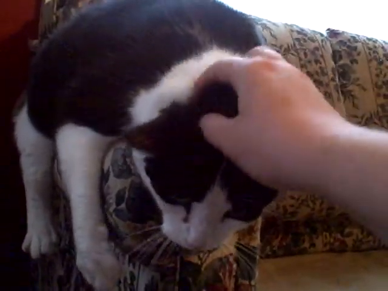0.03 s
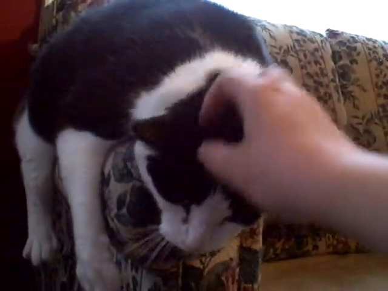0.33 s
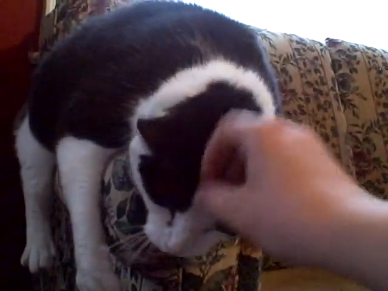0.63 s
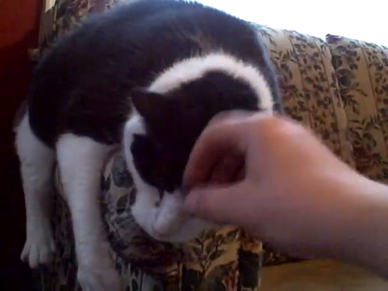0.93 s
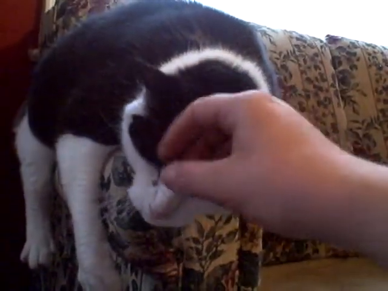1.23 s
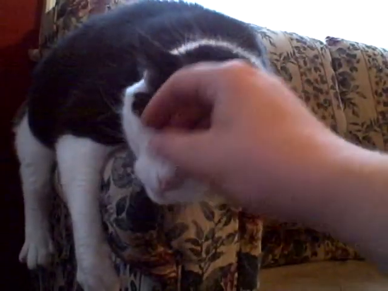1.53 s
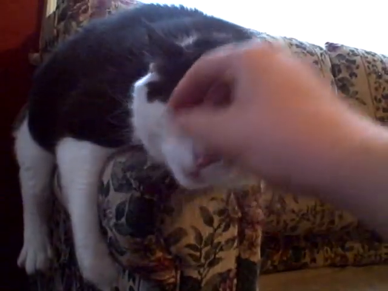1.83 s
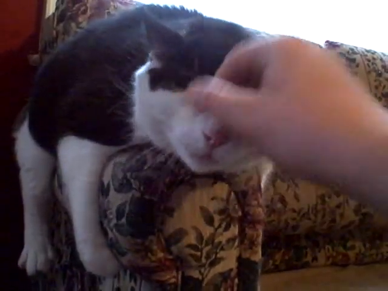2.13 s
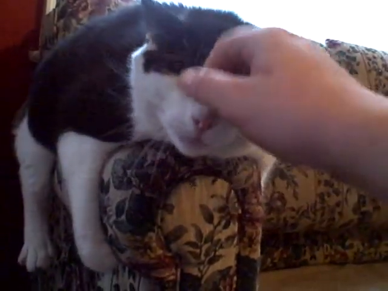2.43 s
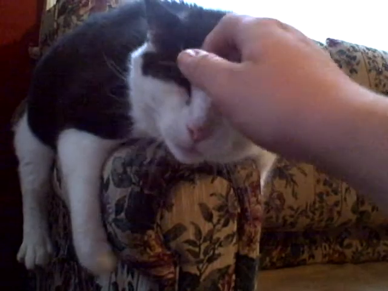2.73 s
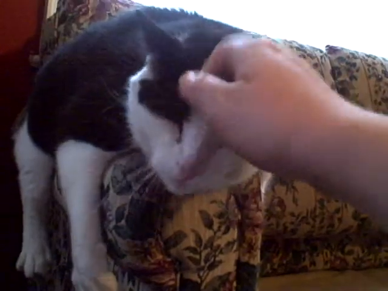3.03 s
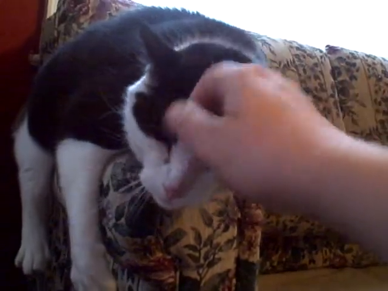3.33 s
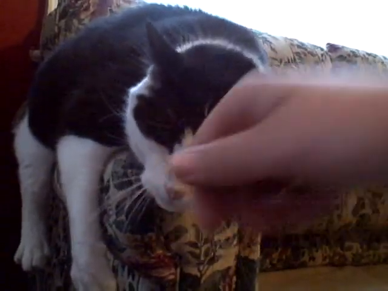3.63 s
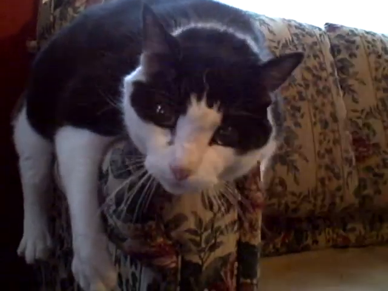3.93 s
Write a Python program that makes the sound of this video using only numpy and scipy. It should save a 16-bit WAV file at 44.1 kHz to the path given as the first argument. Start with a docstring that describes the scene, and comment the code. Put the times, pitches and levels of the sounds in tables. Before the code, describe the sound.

Fur rustling and crackling under a stroking hand, with faint cat purring and steady hiss.

```python
"""Stroking a purring cat.

A hand strokes a cat on a sofa in a small room, close to a small camera. The fur rustles; tufts and
hairs spring free in crackles and sharp ticks. The cat purrs in soft, low puffs from its throat.
Hand and cat shift with dull bumps, and faint short tones whistle. Mains hum and hiss lie under it all.
The microphone rings between 6 and 7 kHz: a peak in the fur and snap spectra."""
import sys
import numpy as np
from scipy import signal
from scipy.fft import rfft, irfft
from scipy.io import wavfile
from scipy.ndimage import uniform_filter1d

SR = 44100
rng = np.random.default_rng(int(sys.argv[2]) if len(sys.argv) > 2 else 0)


def master_out(mix):
    """Clip the mix to full scale and print it as 16-bit PCM to the path in sys.argv[1]."""
    frames = np.transpose(np.atleast_2d(mix))
    ceiling = np.clip(frames, -1, 1)
    pcm = np.round(ceiling * 32767).astype(np.int16)
    wavfile.write(sys.argv[1], SR, pcm)


N = 4 * SR

# Mains hum. Each row: harmonic number, level in dB.
HUM_HARMONICS = [(1, -48.5), (2, -62), (3, -69), (7, -73), (10, -73.5)]
# Spectra of hiss with low rumble, purr pulse, fur rub, crackle snaps and a tick's dry crack.
# Each row: frequency in Hz, relative density in dB.
HISS_SPECTRUM = [(15, 0.5), (27, 10.5), (42, 5), (75, 1.5), (105, -2), (160, -8), (235, -2), (330, -6),
                 (450, -13), (1000, -17.5), (1600, -20), (2900, -17.5), (4200, -17), (5200, -13),
                 (6100, -13.5), (7200, -8), (8000, -20.5), (8600, -27), (9200, -41.5)]
PURR_SPECTRUM = [(50, -9.5), (130, -5), (220, -3.5), (300, 8), (400, -12), (550, -19), (1000, -10.5),
                 (1500, -25), (3000, -38.5), (8000, -54)]
FUR_SPECTRUM = [(150, -25.5), (400, -11), (1000, -11.5), (1500, -14.5), (2900, -10), (4200, -11),
                (5200, -4.5), (6100, 2), (7200, -3), (8000, -13.5), (9000, -29.5)]
SNAP_SPECTRUM = [(150, -26), (500, -15.5), (1500, -22.5), (3200, -14), (4400, -16), (5300, -6.5),
                 (6200, 1.5), (7300, 1), (8100, -15), (9000, -29)]
CRACK_SPECTRUM = [(200, -3), (700, 1), (1600, 8), (3400, 3), (5000, -2.5), (7500, -0.5), (9000, -8)]
# Faint tones. Each row: centre in seconds, length in seconds, pitch in Hz, glide in octaves, level in dB.
WHISTLE_TONES = [(0.874, 0.04, 769, 0.21, -47.5), (0.889, 0.039, 999, 0.087, -53),
                 (0.994, 0.036, 1254, -0.26, -57.5), (1.084, .07, 882, -0.17, -56.5),
                 (1.295, 0.027, 1056, 0.093, -50), (1.418, 0.074, 982, 0.054, -53),
                 (1.527, 0.045, 1007, -0.15, -53), (1.913, .03, 1002, -0.021, -57.5),
                 (2.137, 0.041, 988, 0.0052, -52.5), (2.508, 0.022, 1426, -0.015, -54),
                 (2.822, 0.055, 965, -0.13, -51), (3.041, 0.079, 719, 0.067, -57)]
# Soft knocks. Each row: start in seconds, peak in dB.
BUMP_HITS = [(3.5831, -41), (3.5925, -27.5), (3.603, -37), (3.887, -34.5), (3.995, -33.5)]
# Resonances of a knock. Each row: frequency in Hz, relative level in dB, T60 in seconds.
THUD_MODES = [(235, -12.5, 0.027), (347, -6, 0.02), (610, -5.5, 0.0063), (880, -31, 0.017)]
# Purring. Each row: first pulse in seconds, length in seconds, pulses per second, initial level in dB.
PURR_RUNS = [(0.085, 0.22, 22, -46.5), (0.408, 0.14, 23.5, -50), (0.795, 0.12, 23.7, -50.5),
             (1.032, 0.12, 32, -54), (1.371, 0.12, 45, -49), (1.871, 0.16, 31, -46),
             (2.269, 0.22, 27.5, -47), (2.832, 0.25, 30.3, -45.5), (3.432, 0.22, 34, -47.5)]
# Fingers on the coat. Each row: centre in seconds, length in seconds, band centre in Hz, level in dB.
FINGER_BRUSHES = [(.258, .028, 4830, -47), (0.444, 0.035, 4300, -50), (0.816, 0.041, 2840, -50.5),
                  (0.906, 0.12, 2700, -56.5), (1.076, 0.034, 4700, -49), (1.228, 0.032, 4970, -46.5),
                  (2.836, 0.078, 2700, -54.5), (2.937, 0.055, 2150, -57), (2.964, .07, 3540, -54.5),
                  (3.14, .05, 2180, -53.5), (3.287, 0.049, 2940, -53.5), (3.889, 0.053, 970, -54),
                  (3.932, 0.16, 2850, -58)]
# Stroke envelope. Each row: time in seconds, level of the rub in dB.
STROKE_LEVELS = [(0, -52.5), (.14, -52), (.2, -50), (.38, -48), (0.591, -52), (.7, -49.5), (.76, -50.5),
                 (.95, -50.5), (1.06, -50.5), (1.14, -50.5), (1.53, -48.5), (1.63, -53), (2.02, -49.5),
                 (2.13, -52.5), (2.2, -43.5), (2.37, -51), (2.7, -48.5), (2.77, -52.5), (2.87, -51),
                 (3.1, -48.5), (3.18, -47), (3.39, -52), (3.52, -48), (3.68, -47), (3.77, -51), (4, -47.5)]
# Tufts springing free. Each row: start in seconds, length in seconds, level in dB.
CRACKLE_BURSTS = [(0.156, 0.015, -34), (0.358, 0.008, -39.5), (0.479, 0.025, -46), (0.544, 0.0066, -38.5),
                  (0.629, .012, -42), (0.657, 0.015, -41), (0.682, 0.015, -39.5), (0.89, 0.0078, -40),
                  (1.017, 0.014, -37), (1.04, 0.012, -41), (1.072, 0.009, -44.5), (1.489, 0.005, -48),
                  (1.556, 0.012, -43), (1.868, 0.013, -44.5), (2.859, 0.011, -43.5), (3.502, 0.0068, -40),
                  (3.621, 0.021, -45.5)]
# Single snaps. Each row: start in seconds, ring pitch in Hz, ring peak in dB, crack peak in dB.
HAIR_TICKS = [(0.072, 6050, -33, -48), (.1555, 6700, -29, -51), (.1895, 6100, -32, -53),
              (0.361, 6440, -39, -55), (0.4923, 6760, -29, -55), (.542, 6400, -27, -43),
              (0.553, 5460, -28.5, -38), (0.6515, 6260, -27, -37), (0.6863, 6050, -32, -51),
              (0.6984, 6800, -26.5, -47), (0.964, 6200, -31, -53), (1.023, 6600, -24, -25.5),
              (1.0413, 6200, -30, -54), (1.065, 6080, -31, -59), (1.2187, 5400, -32.5, -45),
              (1.366, 6200, -34, -50), (1.4865, 6000, -27, -41), (1.508, 5960, -29.5, -46),
              (1.743, 5840, -33, -52), (2.0645, 6760, -32.5, -51), (2.2401, 6200, -30, -45),
              (2.3293, 6120, -34.5, -48), (2.4225, 6200, -44, -45), (2.469, 6080, -31.5, -50),
              (2.5381, 7000, -33, -40.5), (2.6972, 5800, -35, -43), (2.8605, 6150, -33, -51),
              (2.941, 6040, -31, -45), (3.3221, 6080, -31.5, -44), (3.4358, 6000, -33, -56),
              (3.502, 6100, -30, -40), (3.6156, 6140, -25.5, -32), (3.7098, 5970, -31.5, -44),
              (3.7743, 6000, -33, -49), (3.8273, 6240, -33, -37)]

RING_RISE_S = 0.0009


def amp(db):
    """Decibels to gain."""
    return 10 ** (np.asarray(db) / 20)


def unit(x):
    """Scales to rms 1."""
    return x / np.sqrt(np.mean(abs(x) ** 2) + 1e-20)


def add(mix, start_s, sound):
    """Mixes a sound in at start_s."""
    part = mix[max(round(start_s * SR), 0):][:len(sound)]
    part += sound[:len(part)]


def response(spectrum, size=8192):
    """Minimum-phase impulse response of energy 1 with the given spectrum."""
    hz, db = np.transpose(spectrum)
    bins_hz = np.fft.rfftfreq(size, 1 / SR) + 1
    gain = amp(np.interp(np.log(bins_hz), np.log(hz), db))
    cepstrum = irfft(np.log(gain))
    cepstrum[1:size // 2] *= 2
    cepstrum[size // 2 + 1:] = 0
    impulse = irfft(np.exp(rfft(cepstrum)))[:size // 2]
    return impulse / np.linalg.norm(impulse)


def colour(x, spectrum):
    """Filters x by a spectrum."""
    return signal.fftconvolve(x, response(spectrum))[:N]


def grains(per_s, spread_db):
    """Random clicks of uneven size."""
    sizes = amp(spread_db * np.minimum(rng.exponential(1, N), 4))
    return unit(sizes * rng.choice([-1, 1], N) * (rng.random(N) < per_s / SR))


def patchy(x, depth_db, size=512):
    """Lets narrow patches of the spectrum swell and fade."""
    frames = signal.stft(x, nperseg=size)[2]
    field = uniform_filter1d(rng.standard_normal(frames.shape), size=5, axis=0)
    field = uniform_filter1d(field, size=6, axis=1)
    return unit(signal.istft(frames * amp(depth_db * unit(field)), nperseg=size)[1][:N])


def swish(noise, length_s, hz, width_oct):
    """A band of noise that swells and fades."""
    bins_hz = np.fft.rfftfreq(len(noise), 1 / SR) + 1
    bell = np.exp(-.5 * (np.log2(bins_hz / hz) / width_oct) ** 2)
    band = unit(irfft(rfft(noise) * bell)[:round(length_s * SR)])
    return band * np.sin(np.linspace(0, np.pi, len(band)))


def hum_and_hiss(mains_hz=60.02, hiss_db=-51):
    """Mains harmonics over steady hiss with a low rumble at the purr's fundamental."""
    t = np.arange(N) / SR
    hum = sum(amp(db) * np.sqrt(2) * np.sin(2 * np.pi * (harmonic * mains_hz * t + rng.random()))
              for harmonic, db in HUM_HARMONICS)
    return hum + amp(hiss_db) * unit(colour(rng.standard_normal(N), HISS_SPECTRUM))


def room(x, t60_s=0.23, gap_s=0.002, gain_db=-12):
    """Short reverberant tail of a furnished room."""
    t = np.arange(SR // 3) / SR
    tail = rng.standard_normal(len(t)) * amp(-60 * t / t60_s) * (t > gap_s)
    return amp(gain_db) * signal.fftconvolve(x, tail / np.linalg.norm(tail))[:N]


def whistles(width_hz=200, pure_share=0.58, air_db=-12):
    """Faint, fuzzy tones that glide a little, each inside a longer, broader puff of noise."""
    out = np.zeros(N)
    lowpass = signal.butter(2, width_hz / 2, fs=SR)
    fuzz = signal.lfilter(*lowpass, rng.standard_normal(N) + 1j * rng.standard_normal(N))
    for centre_s, length_s, hz, glide_oct, db in WHISTLE_TONES:
        position = np.linspace(-.5, .5, round(length_s * SR))
        flutter = unit(np.roll(fuzz, -round(centre_s * SR))[:len(position)])
        body = unit(pure_share + (1 - pure_share) * flutter)
        phase = 2 * np.pi * np.cumsum(hz * 2 ** (glide_oct * position)) / SR
        tone = np.sqrt(2) * (body * np.exp(1j * phase)).real
        air = swish(rng.standard_normal(8192), 2 * length_s, hz, width_oct=0.43)
        add(out, centre_s - length_s / 2, amp(db) * np.cos(np.pi * position) * tone)
        add(out, centre_s - length_s, amp(db + air_db) * air)
    return out


def bumps(rise_s=0.00044):
    """Dull knocks as the hand and the cat shift, damped by fur and cloth."""
    out, t = np.zeros(N), np.arange(SR // 10) / SR
    thud = sum(amp(db - 60 * t / t60_s) * np.sin(2 * np.pi * hz * t) for hz, db, t60_s in THUD_MODES)
    thud *= 1 - np.exp(-t / rise_s)
    for start_s, db in BUMP_HITS:
        add(out, start_s, amp(db) * thud / abs(thud).max())
    return out


def purr(rise_s=0.00434, fade_db=-6.5):
    """Runs of soft, low puffs from the cat's throat, each run fading."""
    out, air = np.zeros(N), colour(rng.standard_normal(N), PURR_SPECTRUM)
    t = np.arange(0, 6 * rise_s, 1 / SR)
    envelope = t / rise_s * np.exp(1 - t / rise_s)
    for start_s, length_s, per_s, db in PURR_RUNS:
        for offset_s in np.arange(0, length_s, 1 / per_s):
            puff = envelope * air[round((start_s + offset_s) * SR):][:len(t)]
            puff *= np.linalg.norm(envelope) / np.linalg.norm(puff)
            add(out, start_s + offset_s - rise_s, amp(db + fade_db * offset_s / length_s) * puff)
    return out


def brushes():
    """Fingers swish briefly across the coat, each time in one band."""
    out = np.zeros(N)
    for centre_s, length_s, hz, db in FINGER_BRUSHES:
        brush = swish(rng.standard_normal(8192), length_s, hz, width_oct=0.19)
        add(out, centre_s - length_s / 2, amp(db) * brush)
    return out


def hair_ring(hz):
    """The very short high ring of one snapping hair."""
    t = np.arange(SR // 100) / SR
    envelope = (t / RING_RISE_S * np.exp(1 - t / RING_RISE_S)) ** 2
    return envelope * np.sin(2 * np.pi * hz * t)


def rustle(snaps_db=-5.5, rings_db=-7, ring_range_hz=(5920, 7420)):
    """A dense rub of fur with dry snaps and single hairs ringing, louder as the stroke presses."""
    stroke_db = np.interp(np.arange(N) / SR, *np.transpose(STROKE_LEVELS))
    rub = patchy(colour(grains(per_s=1500, spread_db=2), FUR_SPECTRUM), depth_db=4.5)
    snaps = colour(grains(per_s=170, spread_db=2.5), FUR_SPECTRUM)
    rings = sum(signal.oaconvolve(grains(per_s=30, spread_db=1.5), hair_ring(hz))[:N]
                for hz in np.linspace(*ring_range_hz, 8))
    return amp(stroke_db) * (rub + amp(snaps_db) * snaps + amp(rings_db) * unit(rings))


def crackles(release_s=0.0045):
    """Tufts of fur spring free in quick runs of tiny snaps."""
    out, snaps = np.zeros(N), grains(per_s=3400, spread_db=-5)
    for start_s, length_s, db in CRACKLE_BURSTS:
        t = np.arange(0, length_s + 5 * release_s, 1 / SR)
        envelope = np.exp(-np.maximum(t - length_s, 0) / release_s)
        burst = envelope * snaps[round(start_s * SR):][:len(t)]
        add(out, start_s, amp(db) * unit(burst) * np.sqrt(length_s / t[-1]))
    return colour(out, SNAP_SPECTRUM)


def ticks(crack_decay_s=0.00079, tail_decay_s=0.011, tail_db=-12.5):
    """Single snaps: a dry crack, a high ring and a short fizzy tail as the snap dies away in the room."""
    out, t = np.zeros(N), np.arange(SR // 20) / SR
    fizz = colour(rng.standard_normal(N), SNAP_SPECTRUM)
    crack_filter = response(CRACK_SPECTRUM, size=1024)
    for start_s, hz, ring_db, crack_db in HAIR_TICKS:
        crack = np.convolve(rng.standard_normal(len(t)) * np.exp(-t / crack_decay_s), crack_filter)
        tail = fizz[round(start_s * SR):][:len(t)] * np.exp(-t / tail_decay_s)
        add(out, start_s, amp(ring_db) * hair_ring(hz))
        add(out, start_s + RING_RISE_S / 2, amp(crack_db) * crack / abs(crack).max())
        add(out, start_s + RING_RISE_S, amp(ring_db + tail_db) * tail)
    return out


def scene():
    """Near sounds with their room tail, over purr, hum and hiss; mono."""
    near = rustle() + brushes() + crackles() + ticks() + bumps() + whistles()
    return (near + room(near) + purr() + hum_and_hiss())[None]


def record(dry):
    """The camera's band limit: a steep low-pass."""
    cutoff_hz = 8950
    lowpass = signal.firwin(301, cutoff_hz, window=("kaiser", 8), fs=SR)
    return signal.oaconvolve(dry, lowpass[None], "same")


dry = scene()
out = record(dry)
master_out(out)
```